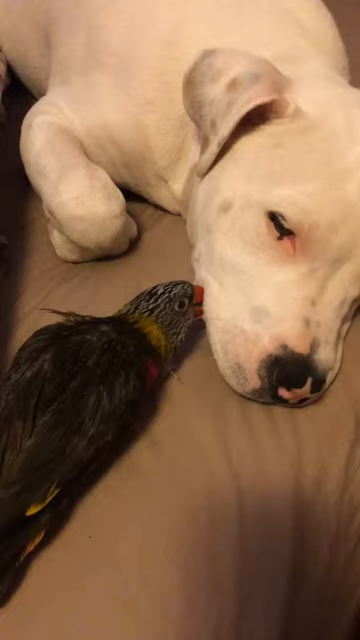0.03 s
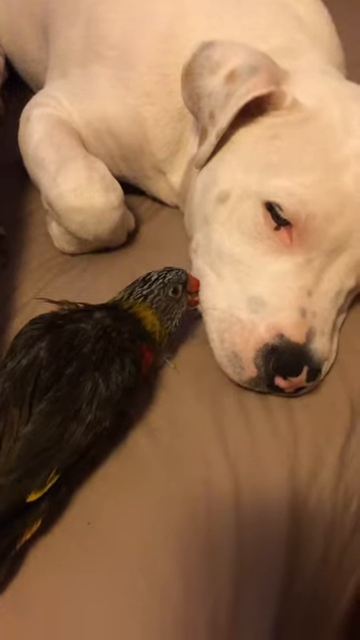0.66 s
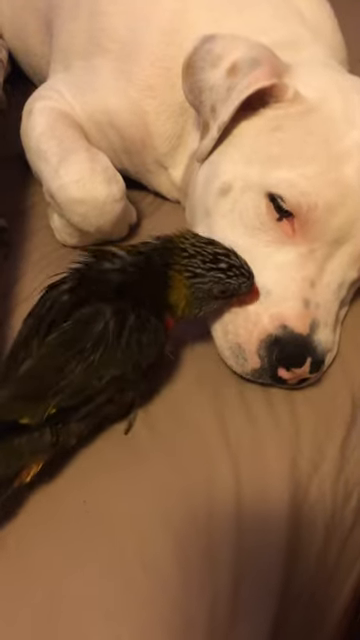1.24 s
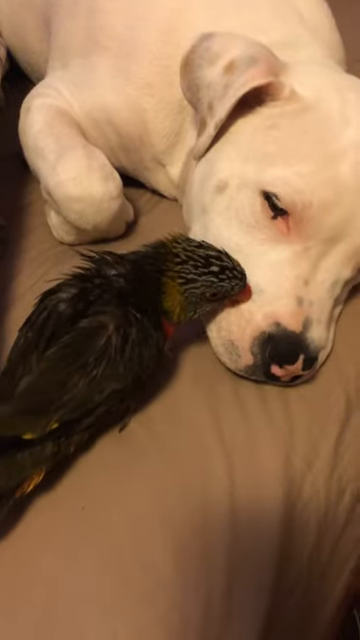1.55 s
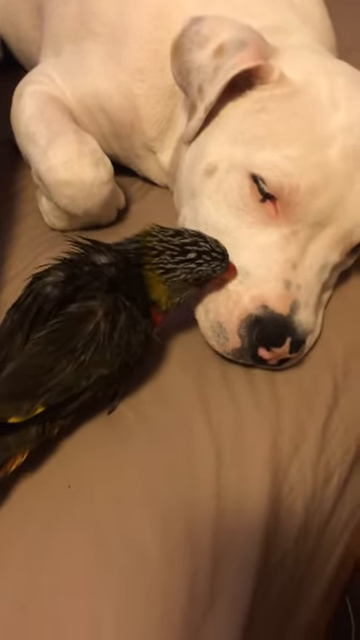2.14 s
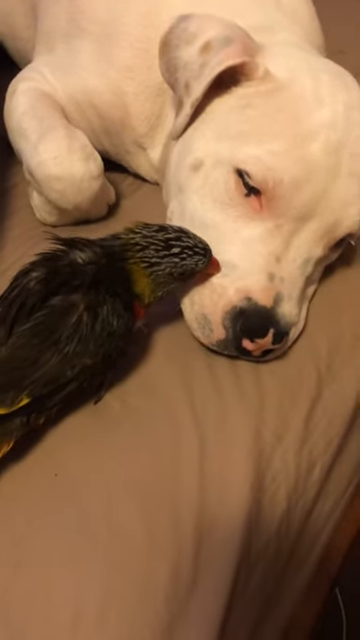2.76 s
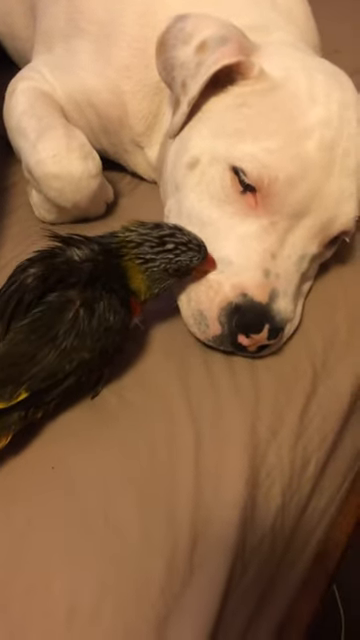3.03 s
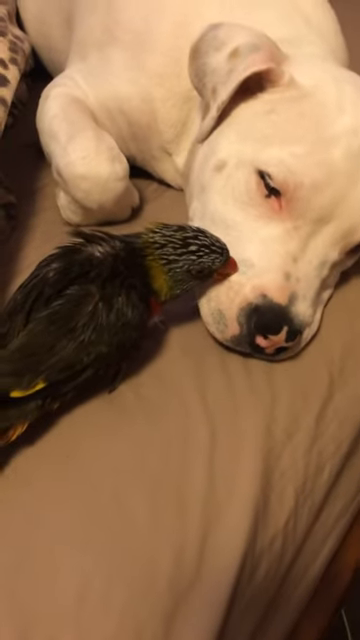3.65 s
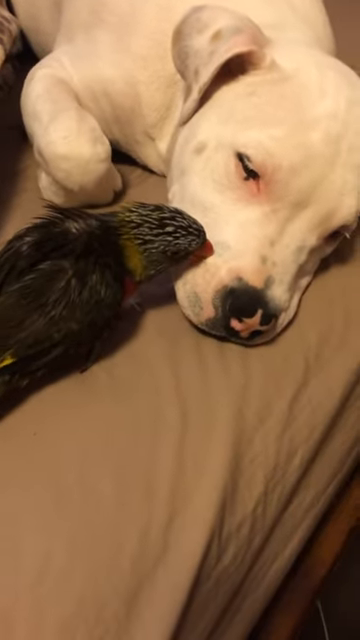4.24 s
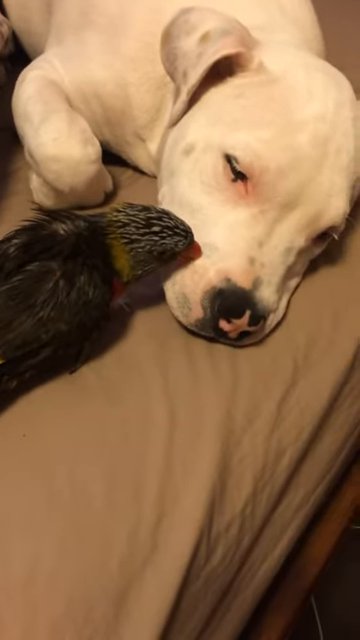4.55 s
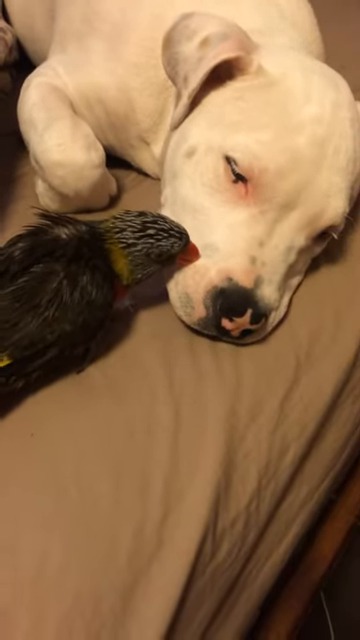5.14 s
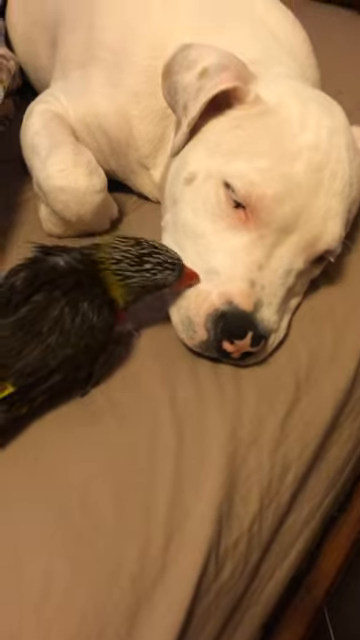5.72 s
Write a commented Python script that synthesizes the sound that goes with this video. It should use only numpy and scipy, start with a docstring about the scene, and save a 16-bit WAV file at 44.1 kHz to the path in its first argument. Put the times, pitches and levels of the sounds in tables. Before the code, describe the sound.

About a second in, a small parrot close to the microphone gives one short, harsh squawk that rasps and runs down into a creak. A faint brush of feathers on a sheet and soft, low mattress bumps come with it. After that the room is quiet, with a low rumble and thin hiss, a few tiny beak ticks dulled by fur, and barely audible airy wisps.

```python
"""Parrot squawk beside a sleeping puppy.

A small parrot nuzzles a puppy on a bed, lunges and gives one harsh, creaky squawk: snaps of the
syrinx speed up and slow down, ringing a throat that opens and shuts. The lunge brushes the sheet
and bumps the mattress. Later the beak ticks softly in fur among faint wispy notes, over room rumble."""
import sys
import numpy as np
from scipy import signal
from scipy.fft import rfft, irfft, next_fast_len
from scipy.io import wavfile

SR = 44100
rng = np.random.default_rng(int(sys.argv[2]) if len(sys.argv) > 2 else 0)


def master(y):
    """Save y as 16-bit WAV."""
    cut = np.clip(np.atleast_2d(y).T, -1, 1)
    pcm = np.round(cut * 32767)  # scale
    wavfile.write(sys.argv[1], SR, pcm.astype(np.int16))


N = 255339
CALL_START_S, CALL_END_S = 0.9995, 1.248


def squawk(level_db=8, jitter=0.04, scatter_db=1, rasp_t60_s=0.012, jet_hz=12100, jet_width_hz=2300):
    """Each syrinx snap rings the throat; the air puff behind it rasps and hisses through the beak."""
    size = 2048
    hz, t = np.fft.rfftfreq(size, 1 / SR), np.arange(size) / SR
    out = np.zeros(N)
    for s, gap_s in zip(*snap_times()):
        opening, db, edge_db, jet_gain = gesture(s)
        low, high = tract(hz, opening, edge_db)
        ring = causal(low + amp(-10) * high) * windpipe(hz, opening)
        puff = rng.standard_normal(size) * amp(-60 * t / rasp_t60_s)
        puff = rfft(puff / np.linalg.norm(puff))
        rasp = puff * causal(amp(-11) * low + amp(2) * high)
        hiss = puff * causal(resonance(hz, jet_hz, jet_width_hz))
        start = round((s + jitter * rng.normal() * gap_s) * SR)
        gain = amp(level_db + db + scatter_db * rng.normal())
        out[start:start + size] += irfft(gain * (ring + rasp) + jet_gain * hiss)
    return out


def snap_times(full_rate_hz=220, full_from_s=1.0685, full_until_s=1.1309):
    """Snap times and gaps: the syrinx runs up to full rate, holds, runs down to a creak."""
    t = np.arange(CALL_START_S, CALL_END_S, 1 / SR)
    run_up_s = 0.0467 * np.maximum(full_from_s - t, 0)
    run_down_s = 0.0767 * np.maximum(t - full_until_s, 0)
    gap_s = 1 / full_rate_hz + run_up_s + run_down_s
    cycles = np.cumsum(1 / gap_s) / SR
    snaps = np.searchsorted(cycles, np.arange(int(cycles[-1]) + 1))
    return t[snaps], gap_s[snaps]


# Pushes of air: t/s, half-width/s, level boost/dB, edge boost/dB, hiss level/dB
AIR_PUSHES = [(1.08, .022, 7, 8.5, -23), (1.148, .016, 7, 4, -24)]


def gesture(t, widest_s=1.122, shut_s=0.052, attack_s=0.008, release_from_s=1.1875, edge_lag_s=0.0046):
    """The throat widens, then shuts fast; air pushes add level, edge (treble) and hiss."""
    opening = np.interp(t, [CALL_START_S, widest_s, widest_s + shut_s], [0.2, 1, 0])
    attack_db = 13.5 * max(1 - (t - CALL_START_S) / attack_s, 0)
    release_db = 412 * max(t - release_from_s, 0)
    db = -6.5 - attack_db - release_db
    edge_db = -14.5 + 13 * opening - attack_db
    jet_gain = 0
    for s, width_s, louder_db, brighter_db, hiss_db in AIR_PUSHES:
        db += louder_db * swell(t, s, width_s)
        edge_db += brighter_db * swell(t - edge_lag_s, s, width_s)
        jet_gain += amp(hiss_db) * swell(t, s, width_s, order=6)
    return opening, db, edge_db, jet_gain


# Low throat resonances: closed f/Hz, open f/Hz, width/Hz, closed level/dB, open level/dB
LOW_FORMANTS = [(717, 1090, 350, -0.5, 5.5), (1500, 2100, 790, 2, -0.5), (2340, 3000, 610, -3.5, -4.5),
                (1155, 1480, 370, -4.5, 3.5)]
# Upper resonances: f/Hz, width/Hz, level/dB
HIGH_FORMANTS = [(4080, 1800, -22), (5218, 750, -15.5), (6610, 900, -22.5), (9196, 1500, -42),
                 (11320, 1800, -26.5), (14260, 2500, -34)]


def tract(hz, opening, edge_db, low_cut_hz=560):
    """Low and upper resonance gains; opening the throat tunes all up, the low ones by the most."""
    low_power = high_power = 0
    for closed_hz, open_hz, width_hz, closed_db, open_db in LOW_FORMANTS:
        centre_hz = closed_hz + opening * (open_hz - closed_hz)
        db = closed_db + opening * (open_db - closed_db)
        low_power += (amp(db) * resonance(hz, centre_hz, width_hz)) ** 2
    stretch = 1 + 0.08 * (opening - 0.7)
    for centre_hz, width_hz, db in HIGH_FORMANTS:
        high_power += (amp(db + edge_db) * resonance(hz, centre_hz * stretch, width_hz)) ** 2
    radiated = hz ** 4 / (hz ** 4 + low_cut_hz ** 4)
    chest = amp(-13) * resonance(hz, 460, 340)  # bass leaks through the body
    return np.sqrt(low_power * radiated + chest ** 2), np.sqrt(high_power)


def windpipe(hz, opening):
    """One reflection from the beak, about one period of the lowest resonance late."""
    closed_hz, open_hz = LOW_FORMANTS[0][:2]
    round_trip_s = rng.normal(1, 0.06) / (closed_hz + opening * (open_hz - closed_hz))
    return 1 + 0.5 * np.exp(-2j * np.pi * hz * round_trip_s)


def breath(at_s=0.98, half_width_s=0.0073, level_db=-53.5):
    """Air sounds two throat resonances just before the syrinx catches."""
    white = rng.standard_normal(N)
    air = filtered(white, lambda hz: resonance(hz, 770, 180) + amp(-2) * resonance(hz, 1720, 260))
    return amp(level_db) * swell(np.arange(N) / SR, at_s, half_width_s) * unit(air)


# Beak ticks: t/s, level/dB, f/Hz, t60/s
BEAK_TICKS = [(2.748, -60, 2997, 0.0084), (4.229, -56.5, 2705, 0.0063), (4.306, -59.5, 2520, 0.0072),
              (4.462, -44.5, 837, 0.0058), (4.588, -56.5, 2502, 0.0052), (5.49, -57, 2394, 0.004),
              (5.657, -55, 7300, 0.0043), (5.69, -62, 1286, 0.024)]


def beak(crack_db=-8, crack_t60_s=0.005, overtone_ratio=2.04, fur_cutoff_hz=5000):
    """Dry ticks: a tiny crack and two ringing modes, dulled by fur."""
    out, t = np.zeros(N + SR), np.arange(SR // 20) / SR
    for s, db, hz, t60_s in BEAK_TICKS:
        phase = 2 * np.pi * hz * t
        ring = (np.cos(phase) + amp(-3) * np.cos(overtone_ratio * phase)) * amp(-60 * t / t60_s)
        crack = rng.standard_normal(len(t)) * amp(crack_db - 60 * t / crack_t60_s)
        out[round(s * SR):][:len(t)] += amp(db) * (ring + crack)
    return filtered(out[:N], lambda hz: 1 / (1 + 1j * hz / fur_cutoff_hz))


# Bumps on the bed: t/s, level/dB, f/Hz
BED_BUMPS = [(0.989, -49, 52.05), (1.074, -51.5, 60), (1.155, -42, 97)]


def mattress(t60_s=0.11, attack_s=0.0031):
    """The lunging bird sets off heavily damped swings of the mattress."""
    out, t = np.zeros(N + SR), np.arange(SR // 4) / SR
    for s, db, hz in BED_BUMPS:
        envelope = amp(db - 60 * t / t60_s) * (1 - np.exp(-t / attack_s))
        out[round(s * SR):][:len(t)] += envelope * np.sin(2 * np.pi * hz * t)
    return out[:N]


# Feather strokes: t/s, half-width/s, level/dB
FEATHER_STROKES = [(.9, 0.16, -74), (0.902, 0.0053, -65), (.933, .016, -68)]
# Rustle spectrum: f/Hz, relative density/dB
FEATHER_SPECTRUM = [(400, -31), (1200, -3.5), (4000, -1.5), (9000, -3.5), (15000, -6.5)]


def feathers():
    """Feathers brush the sheet as the lunge starts."""
    t = np.arange(N) / SR
    envelope = sum(amp(db) * swell(t, s, width_s) for s, width_s, db in FEATHER_STROKES)
    return envelope * noise(FEATHER_SPECTRUM)


# Wispy notes: t/s, length/s, f/Hz, width/Hz, level/dB
WISP_NOTES = [(3.997, 0.037, 1810, 346, -72), (4.002, 0.11, 3500, 1510, -74.5),
              (4.084, 0.032, 1660, 330, -72.5), (4.171, 0.017, 1040, 300, -69),
              (4.223, 0.27, 1040, 320, -76), (4.466, 0.34, 1980, 150, -81.5), (4.6, 0.17, 800, 516, -72)]


def wisps():
    """Short airy notes of band noise, barely above the hiss."""
    out = np.zeros(N)
    for s, length_s, note_hz, width_hz, db in WISP_NOTES:
        n = round(length_s * SR)
        air = filtered(rng.standard_normal(N), lambda hz: resonance(hz, note_hz, width_hz))
        envelope = np.sqrt(np.abs(np.hanning(n)))
        out[round(s * SR):][:n] += amp(db) * envelope * unit(air[:n])
    return out


# Room decay: f/Hz, t60/s
ROOM_DECAY = [(200, 0.22), (1000, 0.27), (3000, 0.27), (12000, 0.1953)]


def room(x, tail_db=-19.5, tail_delay_s=0.005, early_db=-9, early_span_s=(0.0017, 0.012), echoes=14):
    """Direct sound, echoes from near surfaces and a short soft tail."""
    hz, t, spectra = signal.stft(rng.standard_normal(SR // 2), SR, nperseg=256)
    decay = amp(-60 * t / along(ROOM_DECAY, hz)[:, None])
    tail = signal.istft(spectra * decay, SR, nperseg=256)[1]
    response = np.pad(amp(tail_db) * tail / np.linalg.norm(tail), (round(tail_delay_s * SR), 0))
    delays = (np.sort(rng.uniform(*early_span_s, echoes)) * SR).astype(int)
    response[delays] += amp(early_db) * rng.choice([-1, 1], echoes) / np.sqrt(echoes)
    return x + signal.fftconvolve(x, response)[:N]


# House rumble: f/Hz, relative density/dB
RUMBLE_SPECTRUM = [(12, -47), (20, -32), (24, -29), (33, -11.5), (65, -2), (80, 0.5), (92, 1), (134, -8.5),
                   (193, -11.5), (233, -17), (282, -20.5), (400, -27.5), (520, -54.5), (880, -120)]
# Steady hiss: f/Hz, relative density/dB
HISS_SPECTRUM = [(240, -3), (400, 1), (683, -3.5), (927, -7), (2390, -10), (3610, -11.5), (4270, -11.5),
                 (8750, -14.5), (14700, -15), (15400, -24.5)]


def background(rumble_db=-66, hiss_db=-71.5):
    """Low house rumble under a thin, even hiss."""
    return amp(rumble_db) * noise(RUMBLE_SPECTRUM) + amp(hiss_db) * noise(HISS_SPECTRUM)


def amp(db):
    """Decibels to gain."""
    return 10 ** (np.asarray(db) / 20)


def unit(x):
    """Scale to rms 1."""
    return x / np.sqrt(np.mean(x ** 2) + 1e-20)


def along(points, hz):
    """Interpolate (f/Hz, value) points on a log axis."""
    points_hz, values = np.transpose(points)
    return np.interp(np.log(hz + 1), np.log(points_hz + 1), values)


def swell(t, centre_s, half_width_s, order=2):
    """Smooth bump, peak 1; higher order flattens the top."""
    return np.exp(-np.abs((t - centre_s) / half_width_s) ** order)


def resonance(hz, centre_hz, width_hz):
    """Resonance gain, peak 1."""
    return 1 / (1 + (2 * (hz - centre_hz) / width_hz) ** 2)


def causal(gain):
    """Minimum-phase response with this gain."""
    cepstrum = irfft(np.log(np.maximum(gain, 1e-6)))
    half = len(cepstrum) // 2
    cepstrum[1:half] *= 2
    cepstrum[half + 1:] = 0
    return np.exp(rfft(cepstrum))


def filtered(x, response):
    """Apply a frequency response."""
    size = next_fast_len(N + SR // 2)
    return irfft(rfft(x, size) * response(np.fft.rfftfreq(size, 1 / SR)), size)[:N]


def noise(spectrum):
    """Coloured noise, rms 1."""
    return unit(filtered(rng.standard_normal(N), lambda hz: amp(along(spectrum, hz))))


def scene():
    """The bird close by in a quiet room, mono."""
    bird = room(squawk() + breath() + beak() + wisps())
    return (bird + mattress() + feathers() + background())[None]


def record(dry, start_s=0.119, top_hz=15550):
    """Brief opening silence and a brick-wall low-pass."""
    gate = np.arange(N) / SR >= start_s
    return filtered(dry[0] * gate, lambda hz: hz < top_hz)[None]


dry = scene()
out = record(dry)
master(out)
```